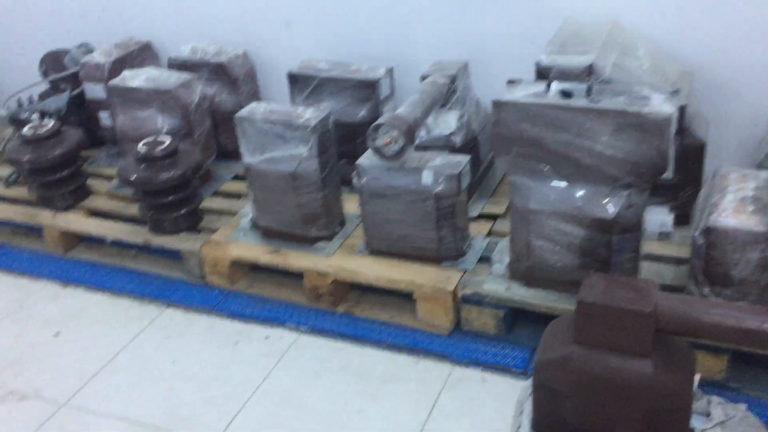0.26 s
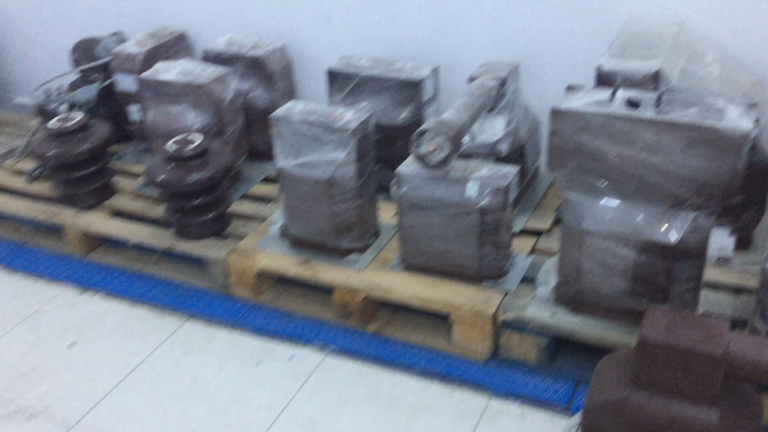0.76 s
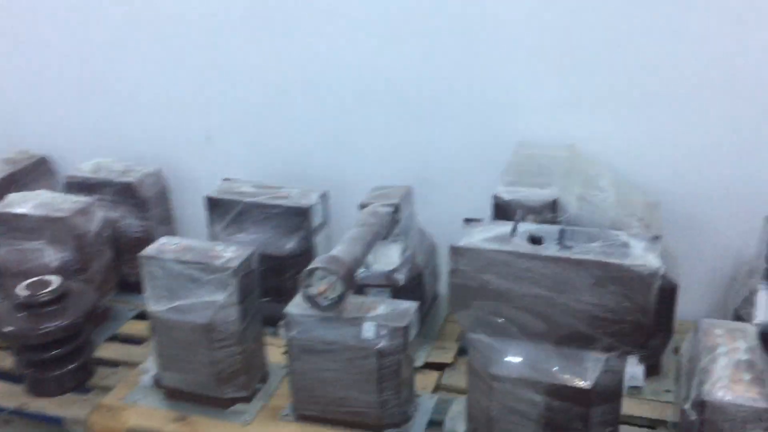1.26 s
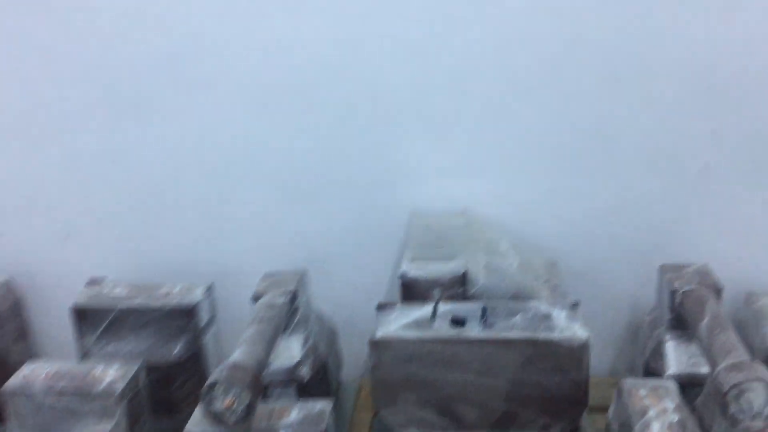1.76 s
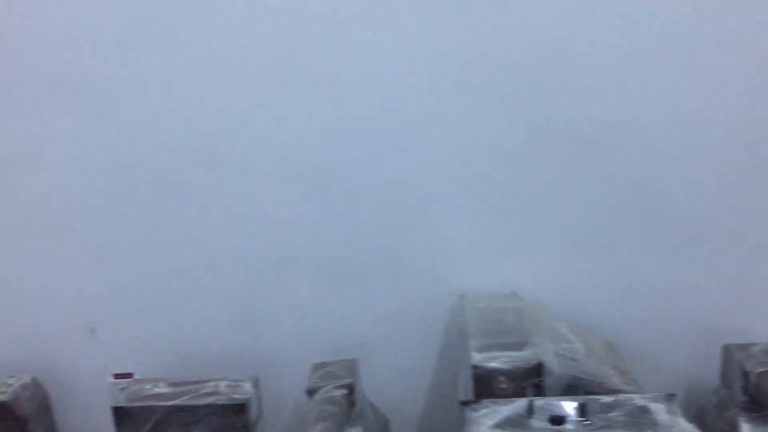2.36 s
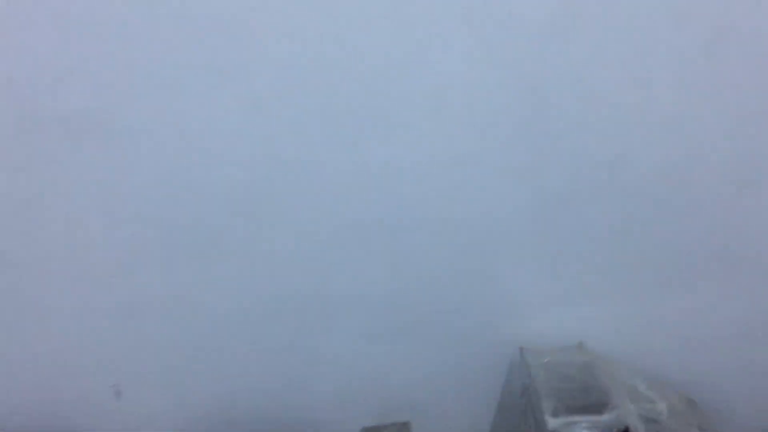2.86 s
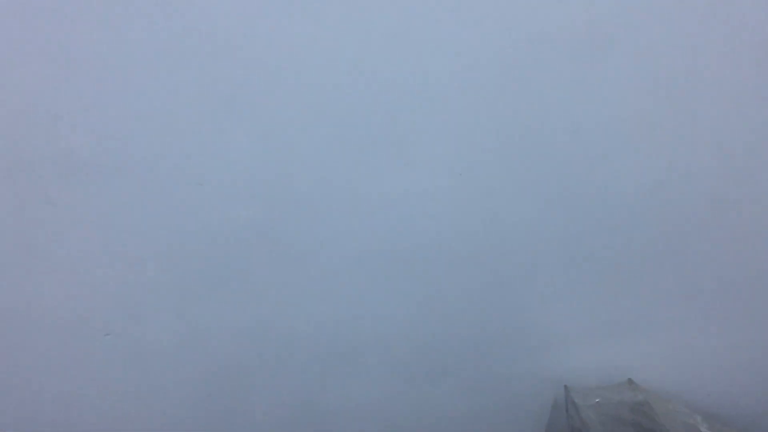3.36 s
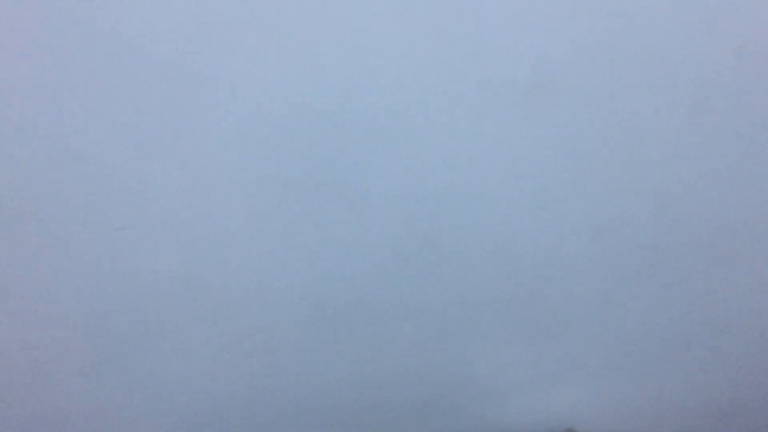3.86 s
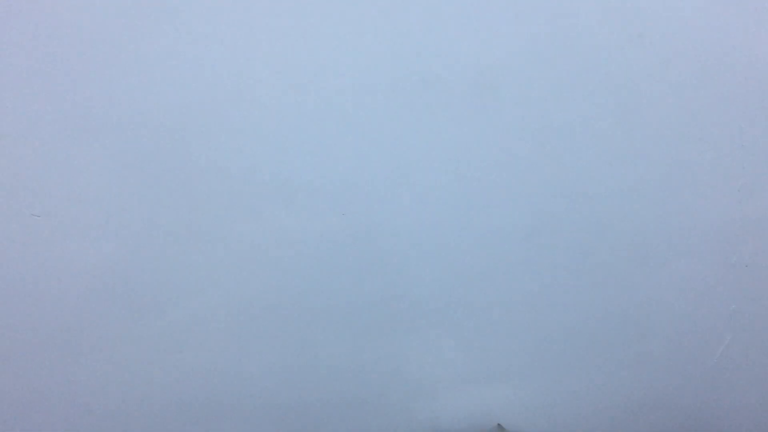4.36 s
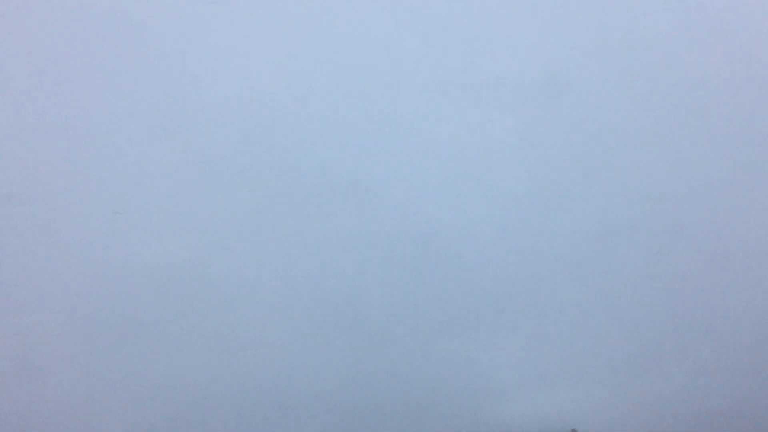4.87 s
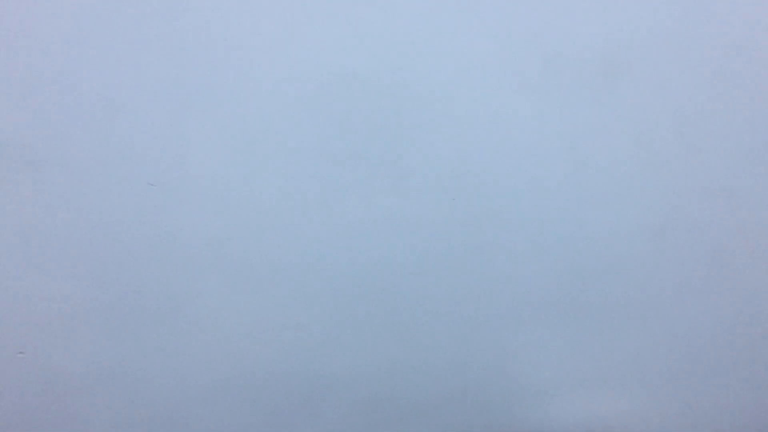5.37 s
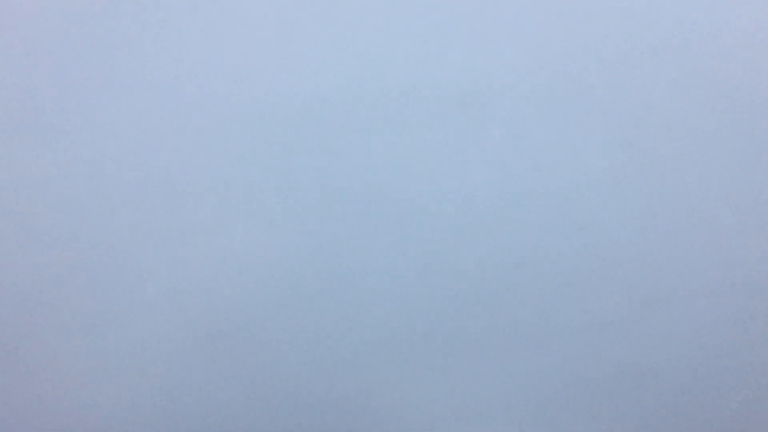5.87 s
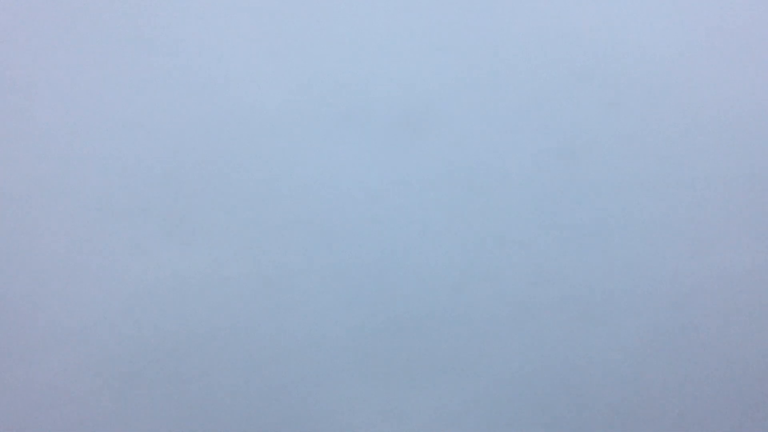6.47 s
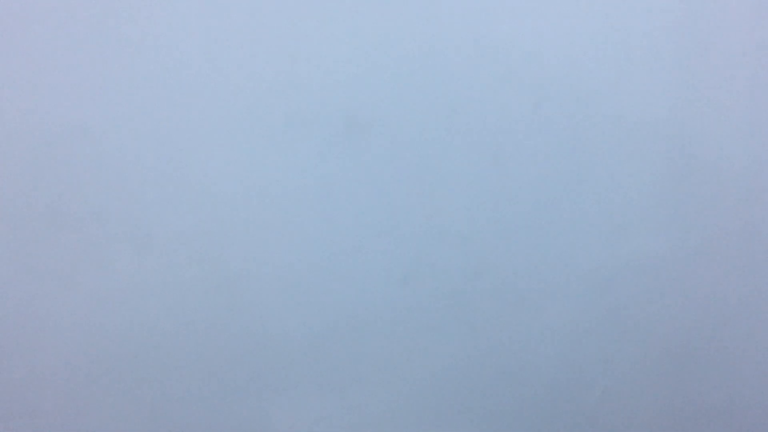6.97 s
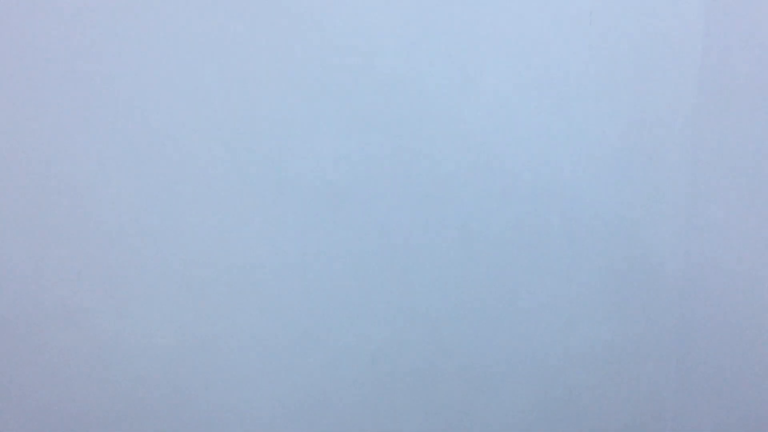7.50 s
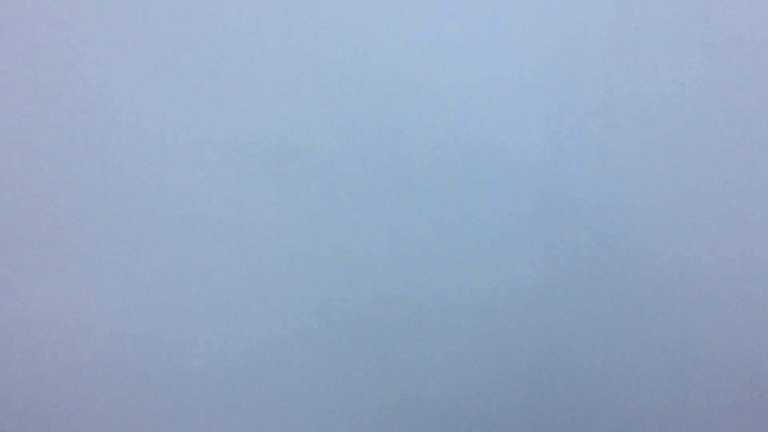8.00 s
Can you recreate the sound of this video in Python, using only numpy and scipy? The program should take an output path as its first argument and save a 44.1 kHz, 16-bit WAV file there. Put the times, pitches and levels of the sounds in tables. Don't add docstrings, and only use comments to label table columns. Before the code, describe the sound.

Low generator drone with a layered mid-pitched whine wavers as the listener drifts through a bare, resonant room, with dull ventilation rumble beneath.

```python
import sys
import numpy as np
from scipy import signal
from scipy.fft import rfft, irfft
from scipy.io import wavfile
from scipy.ndimage import uniform_filter1d, map_coordinates

SR = 44100
rng = np.random.default_rng(int(sys.argv[2]) if len(sys.argv) > 2 else 0)


def wav_out(sig):
    wavfile.write(sys.argv[1], SR, np.round(np.clip(np.atleast_2d(sig).T, -1, 1) * 32767).astype(np.int16))


def voltage_ratio(level):
    return 10 ** (np.asarray(level, float) / 20)


N = 363384
TIME = np.arange(N) / SR
SHAFT_HZ = 10.005

# (each: time in seconds, depth in dB, half width in seconds).
TOOTH_WHINE = [
    (-29.2, -29, [(0, -4, .16), (1.26, 18, 1.13), (4.58, 17, 1.53), (7.74, 12, 0.91)]),
    (-26.5, -27.5, [(.1, 5.5, 0.67), (1.7, 4.6, 0.64), (3.25, 8.5, 0.16), (3.82, 12.4, 0.28), (5, 3.5, 0.98), (6.22, 19, 0.44), (6.68, 11.5, .2), (7.2, 3.5, .45)]),
    (-35.5, -40, [(.61, 7, 0.21), (2.16, 14.5, 0.22), (2.76, 5.5, 0.38), (3.43, 18, 0.28), (3.98, 11, .25), (5.72, 9.5, 0.21), (6.94, 12.5, 0.19), (8.4, 14.5, .39)]),
    (-40.5, -40.5, [(0, 8, 0.89), (1.15, 18.5, 0.27), (2.55, 13.5, 0.64), (4.05, 10.5, 0.45), (5.29, 7, 0.55), (7.1, 7, 0.35), (7.9, 11, 0.3)]),
]
# tooth harmonic number, rms level in dB.
UPPER_WHINE = [(5, -56.5), (6, -64), (7, -68), (8, -66), (9, -66), (10, -69.5), (11, -74.5), (17, -80.5),
               (19, -83.5), (21, -90), (22, -95.5)]
# (each: time in seconds, depth in dB, half width in seconds).
STRONG_ORDERS = [
    (-45.5, -39.6, [(1.61, 6.9, 0.38)]),
    (-39.5, -50.5, []),
    (-35, -43.5, [(.68, 11.5, .15), (1.6, 7, 0.83)]),
    (-36.5, -44.5, [(.4, 17.2, 0.95), (2.81, 11, 0.72), (5.98, 13.5, .23), (7.76, 11, .22)]),
    (-48.5, -48, [(0, 3.5, 1.1)]),
]
# order number, rms level in dB.
STEADY_ORDERS = [(6, -62.5), (12, -53), (13, -52.5), (17, -49), (23, -62.5), (24, -56.5), (32, -58.5),
                 (37, -50.5)]
# (each: time in seconds, depth in dB, half width in seconds).
CORE_HUM = [
    (-38, -47.5, []),
    (-33, -38, [(0, 7.5, 2.05), (2.92, 17, 0.97), (5.67, 5.5, .52)]),
]
# multiple of the mains, rms level in dB.
MAINS_HUM = [(1, -55.5), (3, -52.5), (6, -52.5), (8, -57), (10, -61), (12, -57.5), (16, -63), (18, -63),
             (20, -63), (26, -64), (28, -67), (30, -67)]
# (each: time in seconds, depth in dB, half width in seconds).
FAN_LEVELS = [
    (-62, -38.5, [(5.2, 6, .6), (7.8, 7, 1.4)]),
    (-60.5, -37.5, [(6.6, 7.5, .7), (8.36, 14.5, .6)]),
]
FAN_PITCHES = (144.3, 146.1)
# time in seconds, half width in seconds.
FAN_FLIPS = [
    [(4.75, .3)],
    [(3.75, 0.28), (6.6, .4)],
]
# start in seconds, rise in seconds, length in seconds, rms level in dB.
SLEEVE_STROKES = [
    (3.644, .01, .075, -67.8),
    (3.712, .012, .055, -75),
    (7.19, .04, .13, -82),
    (7.7, .01, .03, -84),
]
# frequency in Hz, density in dB per Hz.
CLOTH_COLOUR = [(3200, 4), (4500, 6.5), (7000, -2), (10000, -2.5), (15500, -7)]
# time in seconds, pitch in Hz, rms level in dB.
SOLE_SQUEAK = [
    (1.28, 7210, -100),
    (1.303, 7320, -78.5),
    (1.345, 7430, -78),
    (1.365, 7200, -78),
    (1.41, 7200, -84),
    (1.425, 7180, -100),
    (1.45, 7200, -130),
]
# time in seconds, peak level in dB, ring in Hz, 60 dB decay time in seconds.
CASING_TICKS = [
    (.09, -30.5, 553, 0.59),
    (4.398, -62, 12800, .005),
    (4.407, -70, 12600, .005),
    (7.715, -78, 14800, .012),
]
# frequency in Hz, density in dB per Hz.
DUCT_RUMBLE = [(25, -92), (36, -81), (55, -74.5), (84, -69), (97, -55), (111, -57.5), (135, -56),
               (175, -60), (215, -54), (232, -58.5), (275, -63.5), (350, -56), (410, -62), (470, -69.5)]
# frequency in Hz, density in dB per Hz.
AIR_RUSH = [(470, -68.5), (700, -68), (840, -69.5), (1250, -71.5), (1600, -75.5), (1850, -80), (2250, -81),
            (2550, -87.5), (3000, -93), (3520, -97), (4250, -106), (4700, -111)]
# centre in Hz, width in Hz, lift in dB.
DUCT_MODES = [(948, 73, 3), (1682, 40, 3), (2774, 87, 6), (3310, 160, 6.5), (3900, 180, 5.5),
              (4430, 89, 4.5)]
# frequency in Hz, density in dB per Hz.
MIC_HISS = [(4850, -114), (5100, -112), (5600, -112), (7000, -117), (7650, -120.5), (8600, -118.3),
            (9800, -121), (10400, -126), (10900, -122), (15700, -126)]


def wobble(rate):
    knots = rng.standard_normal(int(N * rate / SR) + 4)
    return map_coordinates(knots, [TIME * rate])


def dips(nodes):
    return sum(depth_db * np.exp(-((TIME - s) / width) ** 2) for s, depth_db, width in nodes)


def standing(first_db, second_db, nodes):
    step_s, spread_s = 2.84, 0.36
    moved = 1 / (1 + np.exp((step_s - TIME) / spread_s))
    return first_db + (second_db - first_db) * moved - dips(nodes)


def tone(hz, db, drift_db=0., waver=0., start_s=None):
    if start_s is None:
        turns = hz * TIME + rng.random()
    else:
        turns = hz * (TIME - start_s)
    phase = 2 * np.pi * turns + waver * wobble(1.43)
    return np.sqrt(2) * voltage_ratio(db + drift_db * wobble(1.2)) * np.sin(phase)


def noise(points, patchy_db, edge_db=40):
    grains = signal.stft(rng.standard_normal(N + SR), nperseg=512)[2]
    field = uniform_filter1d(rng.standard_normal(grains.shape), 6, 0)
    field = uniform_filter1d(field, 14, 1)
    patches = voltage_ratio(patchy_db * field / field.std())
    white = signal.istft(grains * patches, nperseg=512)[1][:N + SR // 2]
    octave = np.log2(np.fft.rfftfreq(len(white), 1 / SR) + 1)
    hz, db = np.transpose(points)
    outside = np.abs(octave - np.clip(octave, np.log2(hz[0]), np.log2(hz[-1])))
    density_db = np.interp(octave, np.log2(hz), db) - edge_db * outside
    gain = voltage_ratio(density_db) * np.sqrt(SR / 2)
    return irfft(rfft(white / white.std()) * gain, len(white))[:N]


def whine():
    tooth_hz = 19 * SHAFT_HZ
    strong = sum(tone(k * tooth_hz, standing(*row), .3, .5) for k, row in enumerate(TOOTH_WHINE, 1))
    upper = sum(tone(k * tooth_hz, db, 4.0, 1.2) for k, db in UPPER_WHINE)
    return strong + upper


def shaft():
    orders = (7, 8, 9, 21, 4)
    strong = sum(tone(k * SHAFT_HZ, standing(*row), .3, .2) for k, row in zip(orders, STRONG_ORDERS))
    steady = sum(tone(k * SHAFT_HZ, db, 0.55, .2) for k, db in STEADY_ORDERS)
    return strong + steady


def transformer():
    mains_hz = 5 * SHAFT_HZ
    second_db, fourth_db = (standing(*row) for row in CORE_HUM)
    core = tone(2 * mains_hz, second_db, 0.54, 0.75) + tone(4 * mains_hz, fourth_db, 0.45, 0.15)
    return core + sum(tone(k * mains_hz, db, 1.4, 0.19) for k, db in MAINS_HUM)


def fans():
    beat_null_s = 5.46
    total = 0
    for hz, row, flips in zip(FAN_PITCHES, FAN_LEVELS, FAN_FLIPS):
        wave = tone(hz, standing(*row), .8, .15, beat_null_s)
        for s, width in flips:
            wave = wave * np.tanh((TIME - s) / width)
        total = total + wave
    return total


def rustle():
    cloth = noise(CLOTH_COLOUR, 1.5) * voltage_ratio(1.5 * wobble(300))
    stroke = 0
    for s, rise, span, db in SLEEVE_STROKES:
        fade_in = (TIME - s) / rise
        fade_out = (s + span - TIME) / (.3 * span)
        stroke = stroke + voltage_ratio(db) * np.clip(np.minimum(fade_in, fade_out), 0, 1)
    return cloth / cloth.std() * stroke


def squeak():
    times, hz, db = np.transpose(SOLE_SQUEAK)
    pitch_hz, level_db = np.interp(TIME, times, hz), np.interp(TIME, times, db)
    warble_hz = 80 * np.sin(2 * np.pi * 64 * TIME) + 50 * wobble(150)
    phase = 2 * np.pi * np.cumsum(pitch_hz + warble_hz) / SR
    return voltage_ratio(level_db + 3 * wobble(90)) * np.sqrt(2) * np.sin(phase)


def ticks():
    total = 0
    for s, db, hz, t60 in CASING_TICKS:
        age = np.maximum(TIME - s, 0)
        total = total + voltage_ratio(db - 60 * age / t60) * np.sin(2 * np.pi * hz * age)
    return total


def air():
    rumble_db, rush_db = -.5, .2
    open_db = 1 * np.exp(-TIME / 0.54)
    hz = np.fft.rfftfreq(N, 1 / SR)
    lift_db = sum(db * np.exp(-((hz - centre) / width) ** 2) for centre, width, db in DUCT_MODES)
    rush = irfft(rfft(noise(AIR_RUSH, .8, edge_db=119)) * voltage_ratio(lift_db), N)
    rumble = noise(DUCT_RUMBLE, 0.52)
    return voltage_ratio(rumble_db + open_db) * rumble + voltage_ratio(rush_db + open_db) * rush


def scene():
    machine = whine() + shaft() + transformer() + fans()
    handling = rustle() + squeak() + ticks()
    return (machine + handling + air())[None]


def top_cut(x):
    return signal.sosfilt(signal.butter(12, 15750, fs=SR, output="sos"), x)


def record(dry):
    closing = np.sin(np.pi / 2 * np.clip(TIME[::-1] / .004, 0, 1)) ** 2
    mix = closing * (dry + noise(MIC_HISS, .3))
    return top_cut(mix)


dry = scene()
out = record(dry)
wav_out(out)
```